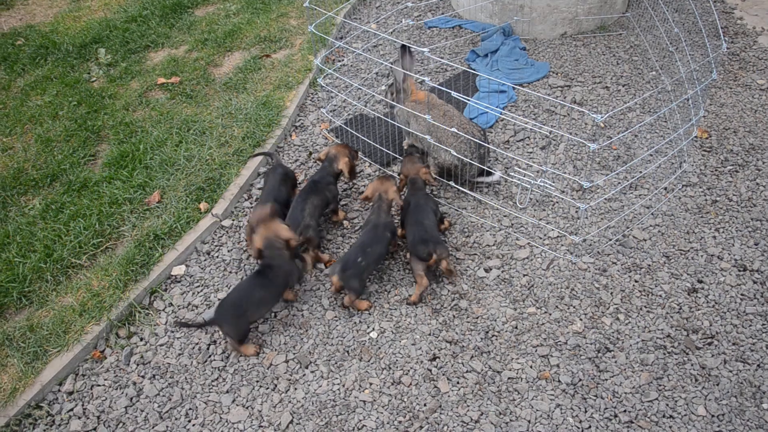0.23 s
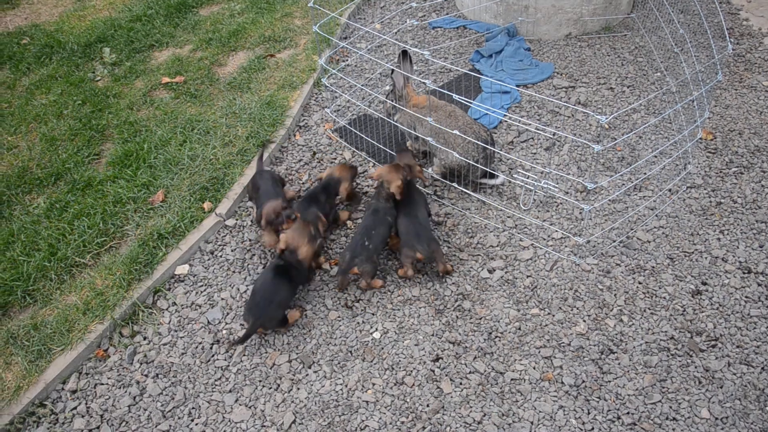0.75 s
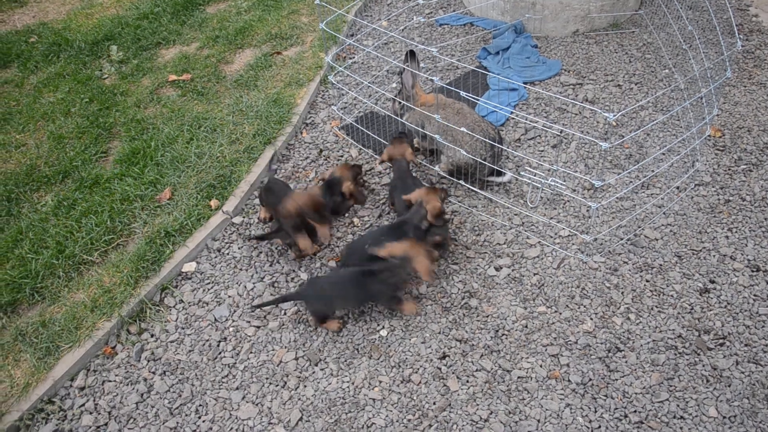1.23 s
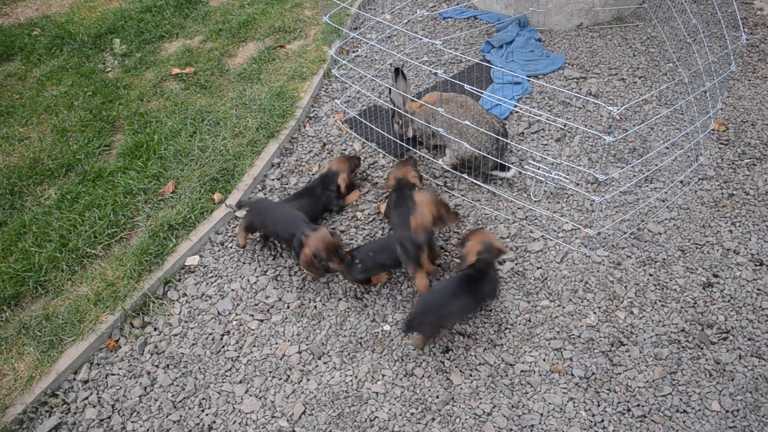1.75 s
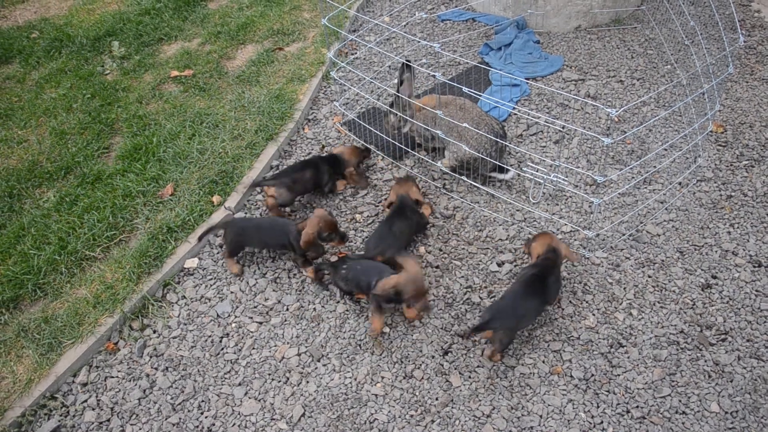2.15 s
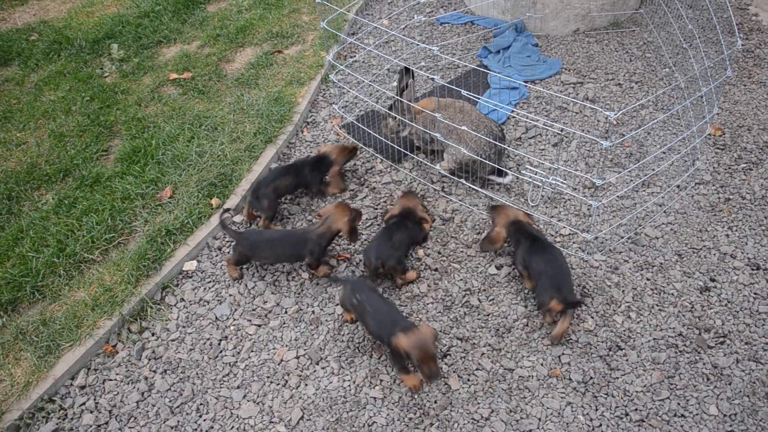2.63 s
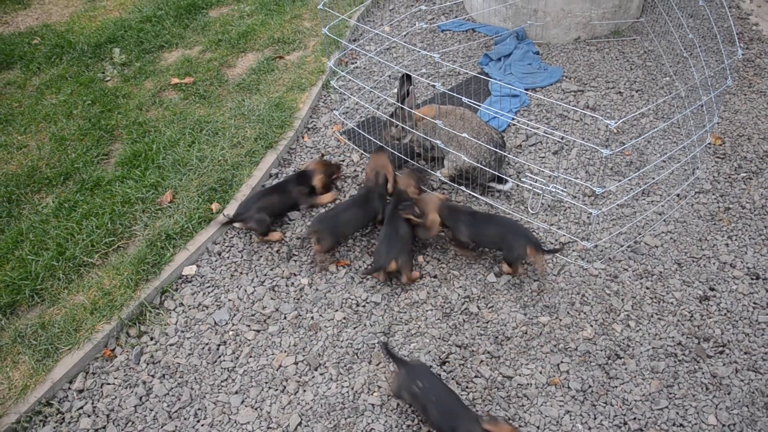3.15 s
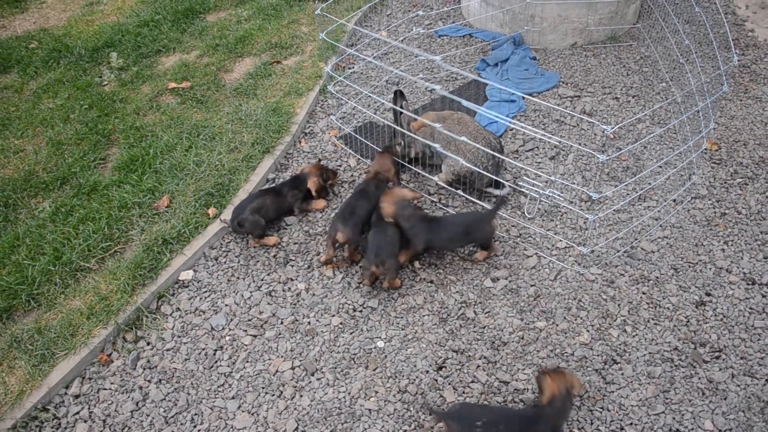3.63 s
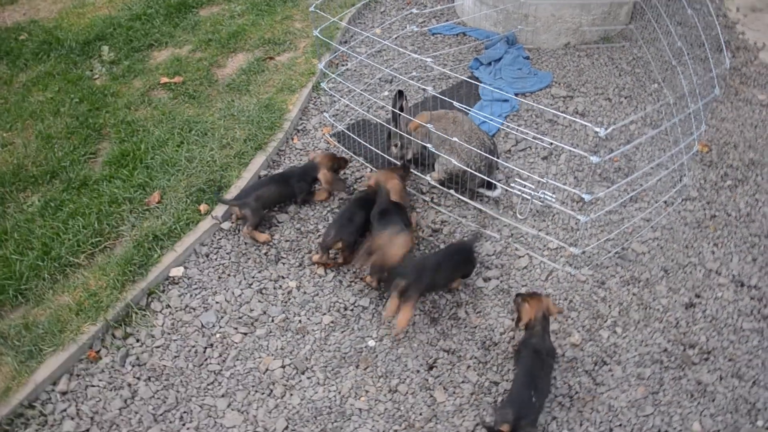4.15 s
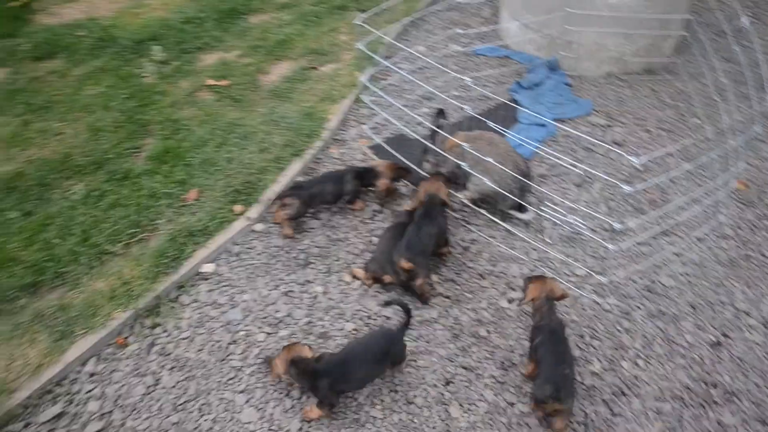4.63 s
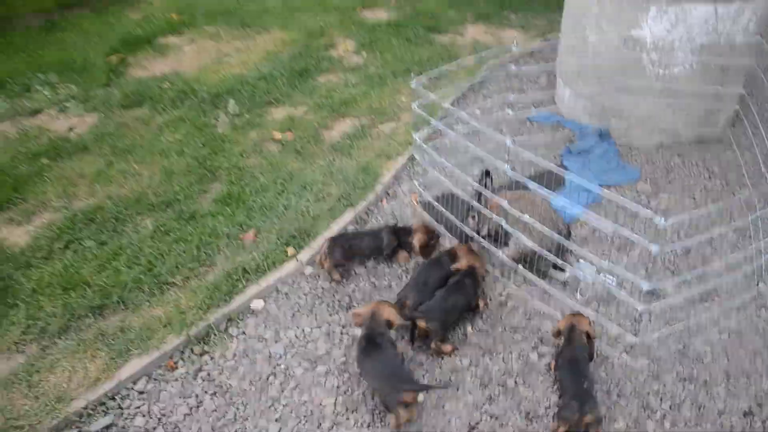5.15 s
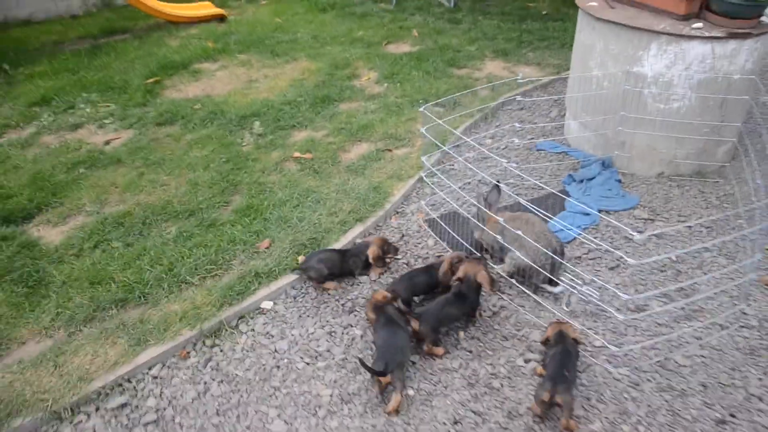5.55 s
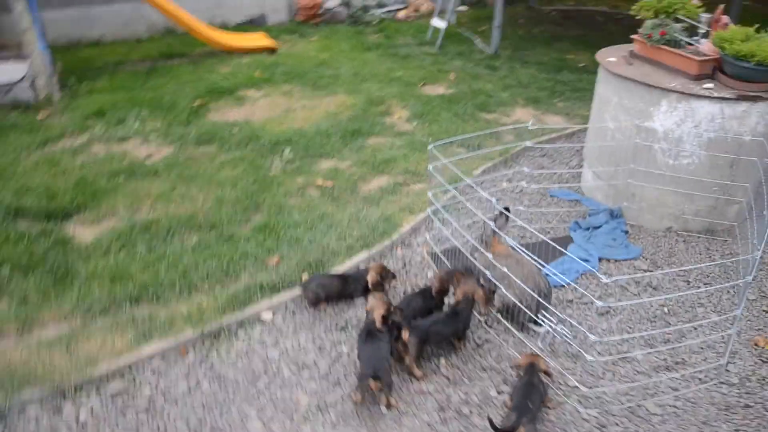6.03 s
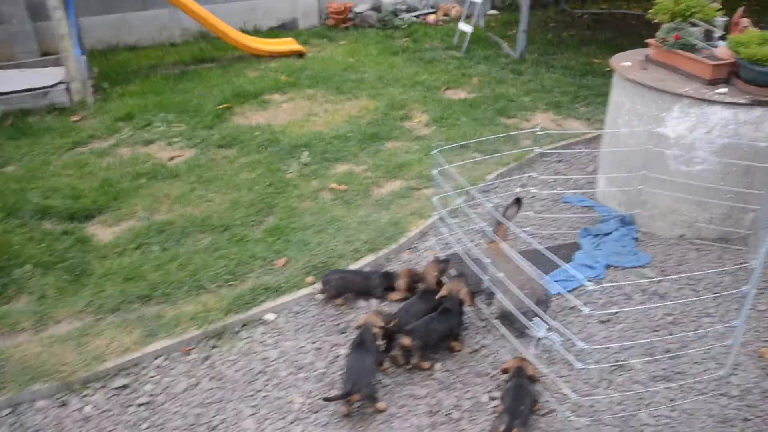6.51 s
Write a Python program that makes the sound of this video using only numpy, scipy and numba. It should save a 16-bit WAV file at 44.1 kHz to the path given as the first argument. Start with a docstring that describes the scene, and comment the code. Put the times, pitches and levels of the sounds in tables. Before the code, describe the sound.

Outdoors on gravel, a litter of puppies yaps in a rapid, uneven stream, some cries overlapping, some clear and squeaky, others rasping. Faint stone ticks and a low soft murmur lie beneath. After a softer patch and a brief lull, the camera is bumped with dull thuds, and sharp yaps resume to the end. Single-channel, moderately close sound with slight hiss and short reflections.

```python
"""Puppies yap on a gravel path in a walled garden, a few metres from a camera.
A low garden murmur, mains hum and faint gravel clicks fade in first: filtered noise, a sine and tiny snaps.
From 0.16 s the yaps come, some overlapping: they slide up from a growl, break into a hoarse, shrill top
and slide down, made by ragged vocal folds through throat resonances; the garden walls throw them back.
Single stones knock from 0.67 s, as short noise bursts; near 5.9 s a hand bumps the camera with dull knocks."""
import sys
import numpy as np
from scipy import signal
from scipy.io import wavfile
from scipy.ndimage import uniform_filter1d, minimum_filter1d
from numba import njit

SR = 44100
rng = np.random.default_rng(int(sys.argv[2]) if len(sys.argv) > 2 else 0)


def generate_wav(signal):
    """Clip the signal to [-1, 1] and save it as 16-bit WAV at the path in sys.argv[1]."""
    frames = np.transpose(np.atleast_2d(signal))
    scaled = np.clip(frames, -1, 1) * 32767
    pcm = np.round(scaled).astype(np.int16)
    wavfile.write(sys.argv[1], SR, pcm)


N = 298998  # length in samples


def undb(db):
    """Gain of a level in dB."""
    return 10 ** (np.asarray(db) / 20)


def unit(x):
    """Scales a sound so that its rms is 1."""
    return x / np.sqrt(np.mean(x ** 2))


@njit
def svf(x, hz, width):
    """Lets through a band around a centre that may move, with gain 1 there (a state-variable filter)."""
    y, band_state, low_state = np.empty(len(x)), 0., 0.
    for i in range(len(x)):
        g, k = np.tan(np.pi * hz[i] / SR), width / hz[i]
        band = (band_state + g * (x[i] - low_state)) / (1 + g * (g + k))
        band_state = 2 * band - band_state
        low_state = low_state + 2 * g * band
        y[i] = k * band
    return y


def steep(x, hz, width):
    """Passes a sound through the same resonance twice, for steeper sides, and scales it to rms 1."""
    centre_hz = hz + np.zeros(len(x))
    once = svf(x, centre_hz, 1. * width)
    return unit(svf(once, centre_hz, 1. * width))


def walk(rate, size=N):
    """Wanders at random: levels drawn rate times a second, smoothed twice and scaled to rms 1."""
    k = int(SR / rate)
    held = np.repeat(rng.standard_normal(size // k + 1), k)
    return unit(uniform_filter1d(uniform_filter1d(held, k), k)[:size])


def add(out, s, x):
    """Mixes the sound x into out from time s in seconds."""
    i = int(s * SR)
    out[i:i + len(x)] += x[:N - i]


# The tone colour of the garden murmur. Each row: pitch in Hz, relative level in dB per Hz.
MURMUR_COLOUR = [(32, -22), (60, -22.5), (110, -36.5), (190, 0), (350, 1), (550, -9.5), (1000, -4),
                 (2200, -17.5), (4500, -43)]
# How the murmur swells and sinks. Each row: time in seconds, relative level in dB.
MURMUR_SWELL = [(0.0, -113), (0.07, -113), (0.45, -49), (1.58, -42.5), (1.941, -54), (2.38, -44),
                (3.168, -52), (4.17, -45.5), (4.46, -57), (5.46, -43.5), (5.68, -54.5), (6.63, -51),
                (6.78, -38)]
# How the mains hum comes and goes. Each row: time in seconds, level in dB before a random waver.
HUM_LEVEL = [(0, -110), (.5, -71.5), (2.5, -76), (2.9, -62), (3.4, -76), (4.5, -60), (4.7, -67),
             (6.05, -57), (6.2, -65), (6.78, -71)]
MAINS_HZ = 50


def garden():
    """Half-octave bands of noise swell and flicker, over mains hum, microphone hiss and a faint whine."""
    t, murmur = np.arange(N) / SR, 0
    colour_hz, colour_db = np.transpose(MURMUR_COLOUR)
    for hz in 23 * 2 ** np.arange(0, 8.1, .5):
        # a higher band is wider, so it holds more power
        db = np.interp(np.log(hz), np.log(colour_hz), colour_db) + 10 * np.log10(hz)
        murmur = murmur + undb(db + 6.1 * walk(12)) * steep(rng.standard_normal(N), hz, hz * .5)
    swell = undb(np.interp(t, *np.transpose(MURMUR_SWELL)) + 8)
    hum_gain = undb(np.interp(t, *np.transpose(HUM_LEVEL)) + 3.9 * walk(14))
    hum = np.sqrt(2) * hum_gain * np.sin(2 * np.pi * MAINS_HZ * t)
    hiss = undb(-78) * steep(rng.standard_normal(N), 7000, 14000)
    whine = undb(-90) * np.sin(2 * np.pi * 15710 * t)
    fade_in = np.minimum(t / 0.65, 1) ** 2
    return unit(murmur) * swell + hum + (hiss + whine) * fade_in


def gravel():
    """Paws shift small stones: sparse faint clicks of very uneven size, in flurries."""
    chance, size = rng.random(N), rng.exponential(size=N)
    flurry = 70 / SR * undb(5.5 * walk(3))  # chance of a click at each sample
    clicks = (chance < flurry) * undb(7.3 * np.minimum(size, 2.4))
    fade_in = np.minimum(np.arange(N) / SR / .6, 1) ** 2
    return undb(-52.5) * svf(clicks, np.full(N, 7000.), 9000.) * fade_in


CLEAR, SOFT, HUSKY, HOARSE, RAGGED = .12, .3, .5, .7, .85  # roughness, 0 to 1
# The yaps, some built from overlapping parts such as a clear onset and a hoarse body.
# Each row: start in seconds, roughness from 0 to 1, rise in seconds, hold in seconds,
# fall in seconds, top pitch in Hz, relative level in dB at the end of the rise,
# swell power (high: loudness comes late in the rise), level change in dB per hold time after the rise,
# mouth resonance in Hz at the start, when open and at the end, low partial level in dB,
# shrill tone level in dB, second resonance in Hz, its glide in octaves per 0.1 s,
# its level in dB, third resonance level in dB.
YAP_PARTS = [ (.156, CLEAR, 0.036, 0.0053, 0.018, 478, -47, 1.4, 2, 703, 1116, 1150, -75, 8.5, 1780, 0.36, 1, -2),
             (.18, HUSKY, 0.037, 0.06, 0.1, 527.6, -28, 1.8, 2.3, 950, 1160, 1060, -62, 6.5, 2160, -0.39, -8.5, -18.5),
             (0.451, HUSKY, 0.085, 0.06, 0.061, 637, -8.5, 3.54, -4, 798, 1076, 1080, -34.5, -1, 2240, -0.0032, -0.5, -7.5),
             (.66, RAGGED, .05, 0.084, 0.071, 614, -14.5, 1.73, -0.5, 900.5, 1030, 1130, -37, 10, 1750, -.085, -0.5, -11),
             (1.013, HOARSE, .035, 0.069, 0.092, 557, -5.5, 1.22, -5, 701, 1090, 1010, -35, 2, 2320, -.034, -13, -10),
             (1.209, HUSKY, 0.071, 0.063, 0.07, 630, -10.5, 1.11, 0.5, 760, 1110, 1100, -30, 0.5, 2050, 0.23, -6, -13),
             (1.513, CLEAR, .04, 0.12, 0.022, 295.4, -27, 2.7, 2, 770, 840, 910, -32, -9.5, 1330, .12, -5, -30),
             (1.665, RAGGED, .05, 0.078, 0.061, 600, -4.5, 1.65, -4, 903, 1059, 1126, -32.5, 1.8, 2104, -.06, -4.5, -9.5),
             (2.117, RAGGED, 0.026, 0.057, 0.041, 594, -16.5, .8, 6, 1290, 1230, 1220, -38.5, 5, 2280, .1, -7, -9.5),
             (2.197, HOARSE, .05, 0.059, 0.057, 610, -1.5, 1.3, -5.5, 803, 1080, 960, -28.5, -1, 2144, .17, -5.5, -9.5),
             (2.445, HUSKY, 0.062, 0.07, 0.073, 587, -4.5, 2, -1.5, 652, 1139, 1045, -33.5, 0, 2115, -0.041, -9.5, -11),
             (2.61, HUSKY, 0.071, 0.056, 0.086, 679.4, -6, 1.5, 0, 654, 1180, 1070, -30, 5, 2020, -0.024, -11.5, -17),
             (2.852, RAGGED, .03, 0.07, 0.065, 560, -7.5, 2, -2.7, 1210, 1150, 930, -29.5, -3, 2073, -0.35, -4.5, -8),
             (3.03, HOARSE, .05, 0.096, 0.06, 572, -6, 3, -7.5, 743, 1050, 997, -33, 3.5, 1776, -0.037, -0.5, -13.5),
             (3.255, RAGGED, 0.046, 0.088, 0.045, 523, -14, 2.5, -3, 932.6, 1012, 1090, -45, 8.5, 1750, .14, 0.5, -14.5),
             (3.58, HUSKY, .05, 0.09, 0.05, 641, -7, 2.6, -6.5, 856.4, 1100, 1100, -39.5, 0.7, 1898, 0.17, -4, -12.5),
             (3.80, SOFT, 0.06, 0.066, 0.075, 653, -7.5, 2.16, -1.5, 750, 1010, 1090, -33.5, 2.5, 2306, -0.35, -6, -6.5),
             (3.985, RAGGED, .045, 0.086, 0.036, 603, -7.5, 1.68, -5, 1010, 1254, 1050, -38, -26, 1887, .08, 1.2, -15.5),
             (4.121, HOARSE, .07, 0.06, .05, 590, -9.5, 1.4, -4, 896, 1130, 1060, -34, 2.5, 2082, -.07, -3.5, -5),
             (4.36, HOARSE, .035, 0.075, 0.1, 539, -4, 1.88, -6, 747, 1060, 1120, -43, 3, 1690, .14, -11, -22.5),
             (4.642, RAGGED, .03, 0.055, 0.0291, 432, -20, 1.4, 1, 1070, 1050, 1070, -39.5, -3.5, 2430, 0.016, -7, -12.5),
             (4.704, CLEAR, 0.034, 0.047, 0.077, 529, -16.5, 0.58, 1.2, 920, 1061, 1068, -38.5, 8.5, 2090, -0.56, 0.6, -13),
             (4.879, HOARSE, .035, 0.039, 0.025, 421, -15.5, 2.5, 1, 908, 1120, 1340, -32, -16, 1870, -0.18, -7.5, -23.5),
             (5.13, RAGGED, 0.055, 0.035, 0.034, 427, -22.5, 6, 1.5, 1270, 1090, 1160, -37, -4.5, 1560, -0.097, -5.5, -19),
             (5.188, CLEAR, 0.045, 0.014, 0.021, 540, -10.5, 2, -0.7, 420.6, 1143, 1120, -42, 4.5, 2300, .3, -18.5, -16.5),
             (5.237, HOARSE, .02, 0.075, 0.043, 519, -10.5, 1.2, -1.5, 869, 1000, 1018, -36.5, -8.5, 2319, -0.061, -9.5, -10),
             (5.43, HUSKY, .11, 0.043, 0.07, 363, -34, 6.1, -4.3, 881.4, 910, 970, -42.5, 0, 1320, 0.17, -3.5, -21),
             (6.06, HOARSE, 0.035, 0.07, 0.06, 599.3, -10, 1.1, 0, 810.4, 1150, 1050, -35.5, -1.5, 2372, -0.29, -11, -8.5),
             (6.48, CLEAR, .022, 0.008, 0.012, 495, -9.5, 1.1, 2.5, 787, 961, 1020, -41, 2.5, 2500, .18, -24, -24),
             (6.494, HUSKY, .05, 0.05, 0.074, 677, -9, 1.07, -1.5, 950, 1120, 1030, -32.5, 2, 2420, -0.15, -12, -13.5),
             (6.75, HUSKY, .03, .03, 0.038, 468.4, -17, 1.6, 4, 990.3, 897, 910, -41, 5.5, 2200, .1, -36.5, -16),
             ]
# The resonances of the upper throat. Each row: basic pitch in Hz (it shifts with the mouth), width in Hz.
UPPER_THROAT = [(3150, 1000), (4750, 850)]
GROWL_HZ = 229.78  # pitch that the glides start from and return to
LOW_WAVER_DB = 2.5
FADE_POWER = 2.3  # high: loudness goes early in the fall
GAPE_LAG_S = .02  # the mouth reaches its open setting this long after the rise
THROAT_HZ, THROAT_WIDTH_HZ, THROAT_DB = 777, 245, -13.5
VOICE_TOP_HZ = 5350


def yap(row):
    """A yap or part of one: vocal folds glide up and down, with a shrill tone; the throat shapes them."""
    start, rough, rise, hold, fall, top_hz, level_db, swell, sag_db, start_hz, open_hz, end_hz = row[:12]
    low_db, shrill_db, second_hz, glide, second_db, third_db = row[12:]
    n = int(.36 * SR)
    since = np.arange(n) / SR
    after_rise, after_middle = since - rise, since - rise - hold / 2
    up = np.clip(since / rise, 0, 1)
    down = np.clip((after_rise - hold) / fall, 0, 1)
    effort = np.sin(up * np.pi / 2) * (1 - down)

    # the pitch arches over the whole glide and tops out in the middle of the hold
    climb = np.clip(since / (rise + hold / 2), 0, 1)
    drop = np.clip(after_middle / (fall + hold / 2), 0, 1)
    arch = (1 - (1 - climb) ** 2.6) * np.cos(drop * np.pi / 2) ** 1.3
    hz = GROWL_HZ + (top_hz - GROWL_HZ) * arch

    # the low partial is heard on the glides and weakens with effort and pitch
    low = np.sin(2 * np.pi * np.cumsum(hz * (1 + .03 * walk(60, size=n))) / SR)
    weaken_db = 11 * effort * ((hz - GROWL_HZ) / 380) ** 2
    low *= undb(low_db - weaken_db + LOW_WAVER_DB * walk(50, size=n))
    low *= np.minimum(4.9 * up, 1) * np.minimum(3.2 * (1 - down), 1)

    # the mouth opens during the rise and drifts through the hold
    opened = rise + GAPE_LAG_S
    mouth_times = [0, opened, opened + hold + fall / 2]
    mouth_hz = uniform_filter1d(np.interp(since, mouth_times, [start_hz, open_hz, end_hz]), 600)
    gain = undb(level_db + sag_db * np.maximum(after_rise, 0) / hold)
    gain *= up ** swell * (1 - down) ** FADE_POWER

    # the glide up is clearest; the fall is hoarse, and so is the top of a rough yap
    ragged = np.maximum((.12 + .88 * rough) * effort ** 3, .8 * np.minimum(4 * down, 1))
    jitter = (.006 + .078 * ragged) * walk(350, size=n)
    phase = 2 * np.pi * np.cumsum(hz * (1 + jitter)) / SR
    folds = unit(sum(np.cos(k * phase) for k in range(1, 15)))
    folds *= undb(2.76 * ragged * walk(147.8, size=n))
    folds += (.08 + .95 * ragged) * rng.standard_normal(n)

    # the shrill tone follows the mouth resonance
    shrill = 2 * np.pi * np.cumsum(mouth_hz * (1 + .045 * rough * walk(150, size=n))) / SR
    flutter = undb(shrill_db + 3.7 * rough * walk(80, size=n)) * up ** 1.3 * (1 - down)
    voice = steep(folds, mouth_hz, 390) + flutter * np.sin(shrill)
    voice -= undb(THROAT_DB) * steep(folds, THROAT_HZ, THROAT_WIDTH_HZ)

    second_hz = second_hz * 2 ** (glide * np.clip(after_middle / .1, -1, 1))
    second = steep(folds, second_hz, 320) + 0.46 * steep(folds, second_hz, 1100)
    second += 0.93 * (1 - rough) * flutter * np.sin(2 * shrill)
    voice -= undb(second_db) * second

    # the treble opens as the cry gets louder
    bright = (gain / gain.max()) ** 0.53
    shift = .8 + .2 * mouth_hz / 1050 + .04 * walk(15, size=n)
    third, fourth = (steep(folds, hz * shift, width) for hz, width in UPPER_THROAT)
    upper = third + .5 * (1 - rough) * flutter * np.sin(3 * shrill) - undb(-17.5) * bright * fourth
    voice += undb(third_db) * bright * upper
    voice = signal.sosfilt(signal.cheby1(6, .5, VOICE_TOP_HZ, fs=SR, output="sos"), voice)

    breath_gain = undb(-46 + .4 * third_db + 4.1 * walk(200, size=n)) * bright
    breath = breath_gain * steep(rng.standard_normal(n), 8500, 15000)
    return low + gain * (undb(-3.5) * voice + breath)


@njit
def walls(x, lags, drift, gain, damp):
    """Eight delay lines feed each other, duller on every round; drifting lengths avoid a steady ringing."""
    line, soft, out = np.zeros((8, 8192)), np.zeros(8), np.zeros(len(x))
    for i in range(len(x)):
        total = 0.
        for k in range(8):
            # read between two samples, as the delay is not a whole number
            at = i - lags[k] - drift[k & 1, i] + 8192
            j = int(at)
            late = line[k, j & 8191] + (at - j) * (line[k, (j + 1) & 8191] - line[k, j & 8191])
            soft[k] += (1 - damp) * (gain[k] * late - soft[k])
            total += soft[k]
            out[i] += soft[k] * (1 - 2 * (k & 1))
        for k in range(8):
            line[k, i & 8191] = x[i] + soft[k] - total / 4
    return out


# The knocks of single stones. Each row: time in seconds, relative level in dB.
STONE_KNOCKS = [(0.667, -50), (0.9484, -29.5), (0.9874, -29), (1.2199, -41), (1.4486, -52), (2.4236, -46),
                (2.8616, -35.5), (4.3084, -37.5), (5.064, -44), (5.094, -51), (5.3727, -43),
                (5.4111, -35.5), (5.8164, -49), (6.3837, -51.5), (6.4103, -59), (6.4814, -36.5)]


def ticks():
    """Single stones knock together under the paws: a snap of noise that dies away in an instant."""
    out, t = np.zeros(N), np.arange(400) / SR
    for (s, db), noise in zip(STONE_KNOCKS, rng.standard_normal((len(STONE_KNOCKS), 400))):
        add(out, s, undb(db + 1) * noise * np.exp(-t / 0.0017))
    return svf(out, np.full(N, 2200.), 7000.)


# The knocks that make up the camera bump. Each row: time in seconds, relative level in dB.
CAMERA_KNOCKS = [(5.859, -35), (5.896, -36.5), (5.917, -43), (5.968, -42)]


def bumps():
    """A hand shifts on the camera: dull knocks through its body, as two bands of dying noise."""
    out, t = np.zeros(N), np.arange(2600) / SR
    for (s, db), noise in zip(CAMERA_KNOCKS, rng.standard_normal((len(CAMERA_KNOCKS), 2600))):
        knock = steep(noise, 173, 224) + undb(-5.0) * steep(noise, 600, 680)
        add(out, s, undb(db) * knock * np.exp(-t / 0.025))
    return out


GARDEN_T60_S = 0.31  # time for the echo to fall by 60 dB, before damping
GARDEN_DAMP, GARDEN_DB = 0.36, -13.5  # dulling on each round (0 to 1), echo level


def scene():
    """The pups, their echo from the garden walls, and the background."""
    pups = np.zeros(N)
    for row in YAP_PARTS:
        add(pups, row[0], yap(row))
    lags = np.array([661, 887, 1129, 1409, 1697, 1933, 2251, 2609])  # samples
    drift = 9 * np.array([walk(12), walk(12)])  # samples, at random
    round_gain = undb(-60 * lags / SR / GARDEN_T60_S)
    # the tiny offset keeps the delay lines from reaching extremely small numbers, which are slow
    echo = walls(pups + 1e-18, lags, drift, round_gain, GARDEN_DAMP)
    return (pups + undb(GARDEN_DB) * echo + ticks() + gravel() + bumps() + garden())[None]


@njit
def limiter(x, top, step, recover, wait):
    """Gain drops by a sudden step at a peak over the top, which ticks, and creeps back."""
    y, g, last = np.empty(len(x)), 1., -wait
    for i in range(len(x)):
        if abs(x[i] * g) > top and i - last > wait:
            g, last = g * step, i
        g = min(g * recover, 1.)
        y[i] = x[i] * g
    return y


LIMIT, STEP_DB, RECOVER_DB_S = 0.61, -.75, 28  # peak that sets off a step, step in dB, recovery in dB per s
TOP_HZ = 15800


def record(dry):
    """A stepping limiter, then a quick smooth one for what overshoots; the camera cuts bass and top."""
    held = limiter(dry[0], LIMIT, undb(STEP_DB), undb(RECOVER_DB_S / SR), 350)[None]  # waits 350 samples
    peak = -minimum_filter1d(-np.abs(held), 89, axis=1)  # the largest peak nearby
    held = held * uniform_filter1d(np.minimum(1, .7 / (peak + 1e-9)), 89, axis=1)
    held = signal.sosfilt(signal.butter(2, 30, "high", fs=SR, output="sos"), held)
    return signal.sosfilt(signal.ellip(10, .2, 70, TOP_HZ, fs=SR, output="sos"), held)


dry = scene()
out = record(dry)
generate_wav(out)
```